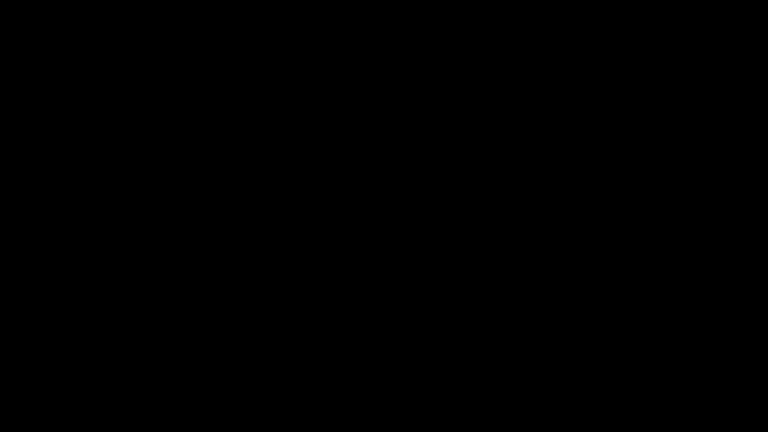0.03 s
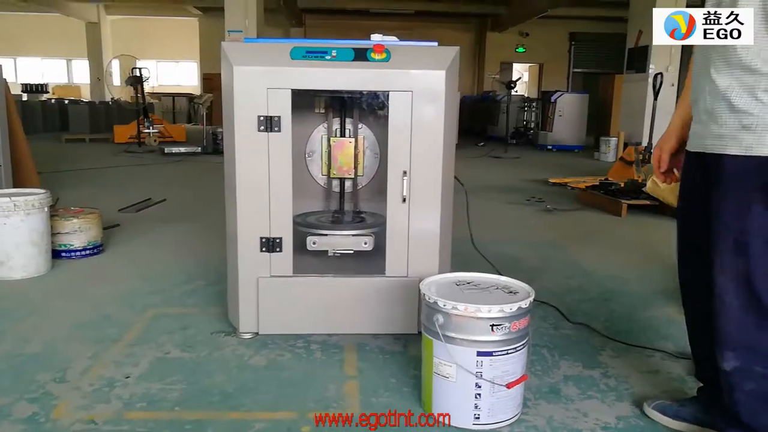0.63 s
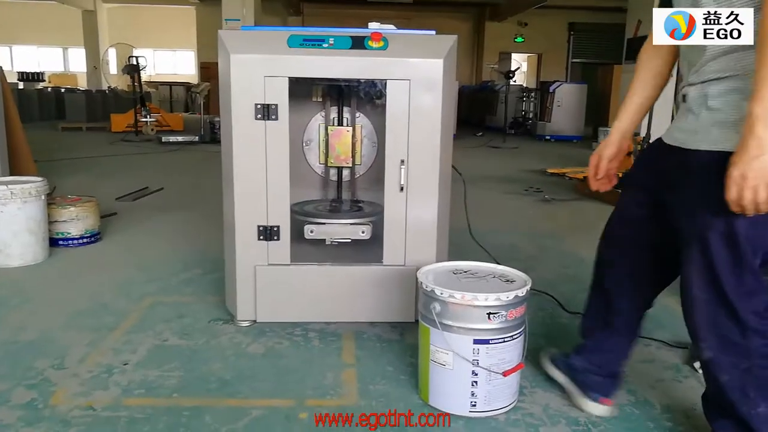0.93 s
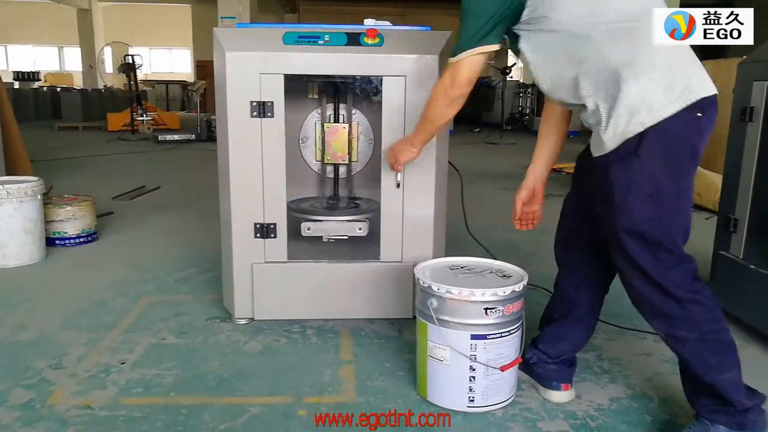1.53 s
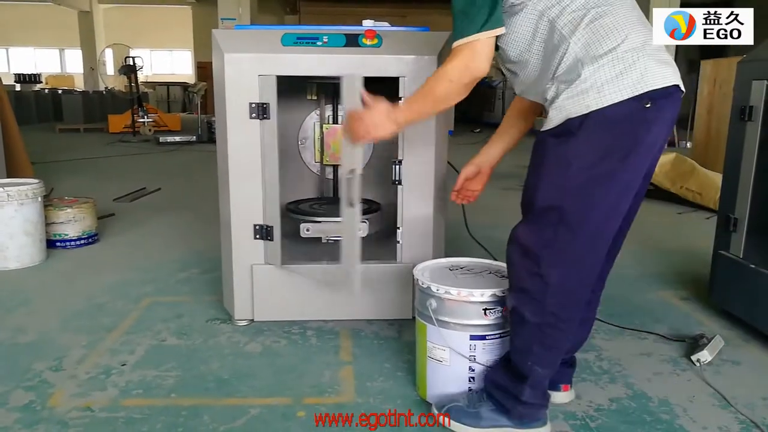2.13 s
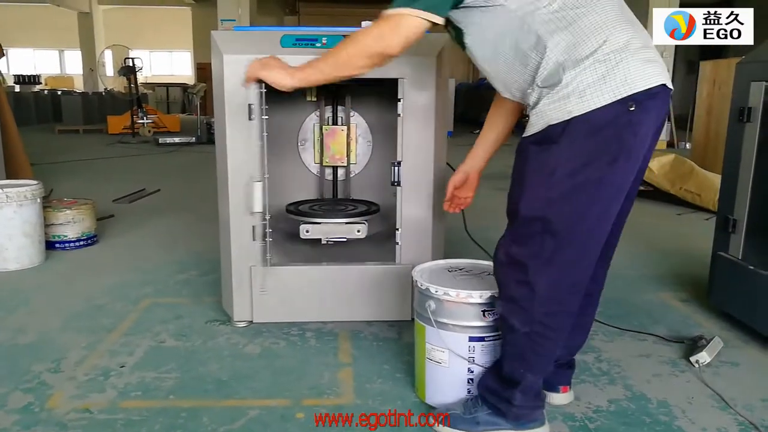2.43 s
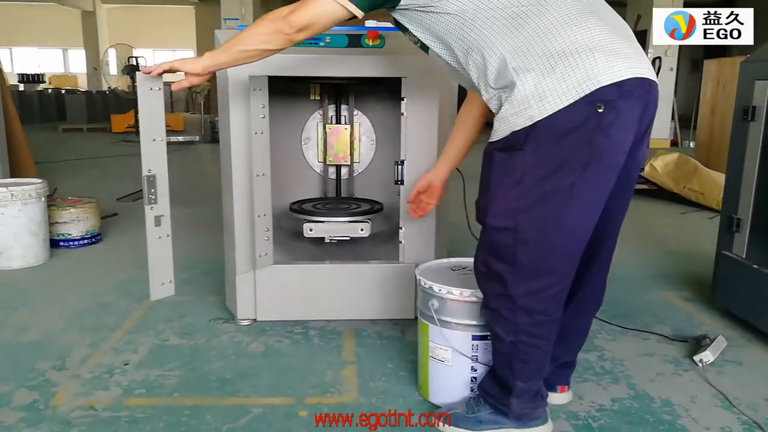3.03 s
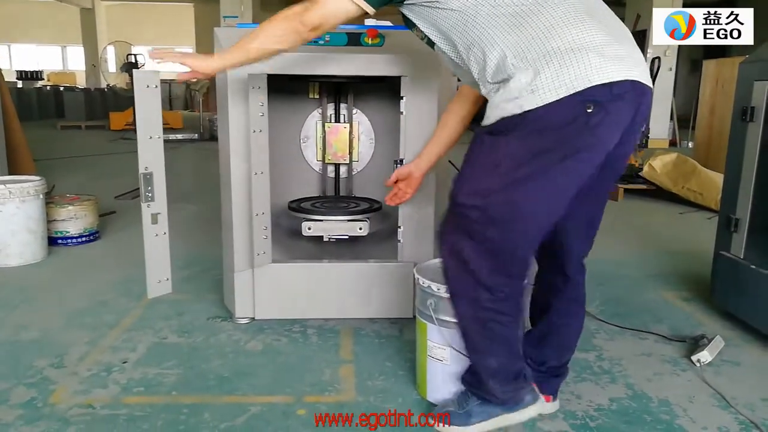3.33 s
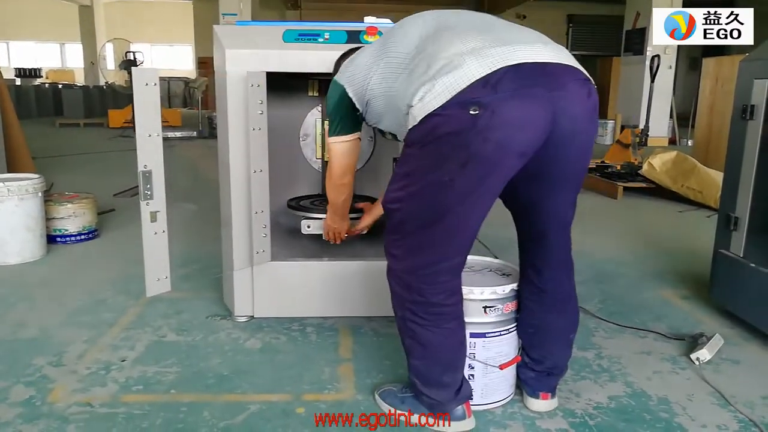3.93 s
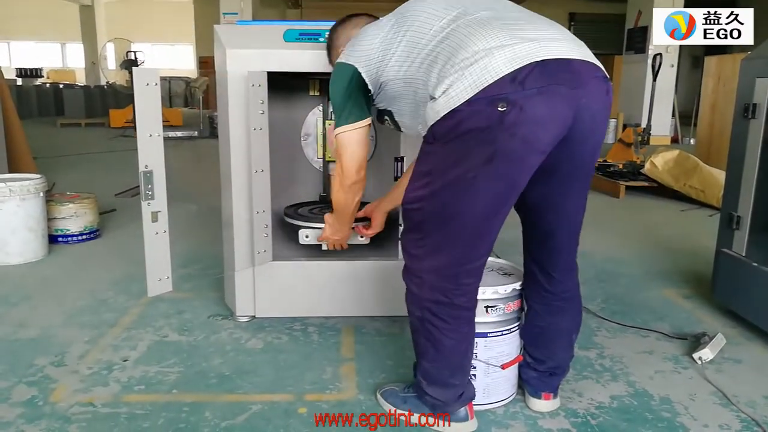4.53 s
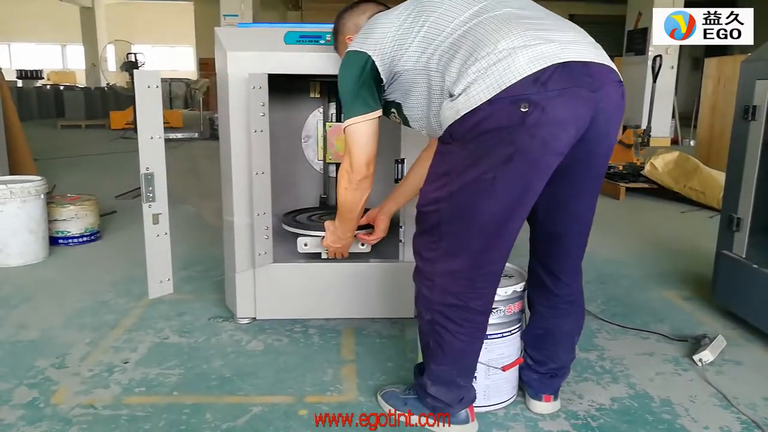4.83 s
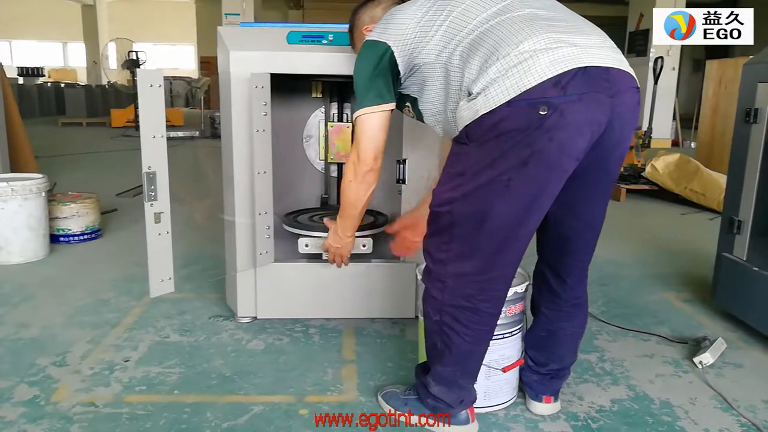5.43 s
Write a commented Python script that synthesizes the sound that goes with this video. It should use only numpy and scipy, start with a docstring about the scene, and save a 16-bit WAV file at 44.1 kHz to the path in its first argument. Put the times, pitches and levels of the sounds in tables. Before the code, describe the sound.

Steady ventilation hums in a large workshop. Clothes rustle faintly, a soft step lands, and a paint mixer's door unlatches with light clicks, a dull thud and a tiny squeak. A steel clamp catch snaps loudly and scrapes, then the tray rumbles over its rails and hits its stop with a ringing clack and rattle. The microphone picks up the hall's echo on the metal impacts.

```python
"""The clamp tray of a paint mixer booms over its rails, clacks against its end stop and rattles.
Its rollers drive the cabinet's panel resonances; each impact on steel excites modes that ring and decay.
Before that a man steps up with rustling clothes, unlatches the door on its faintly squeaking hinge,
and the clamp catch snaps free. A large workshop hall reverberates over steady ventilation.
The sound opens with a soft pop."""
import sys
import numpy as np
from scipy import signal
from scipy.fft import rfft, irfft
from scipy.io import wavfile
from scipy.ndimage import uniform_filter1d

SR = 44100
rng = np.random.default_rng(int(sys.argv[2]) if len(sys.argv) > 2 else 0)


def to_wav(sig):
    """Store sig (one row per channel, or 1-D mono) as 16-bit WAV at the path in sys.argv[1].

    Samples outside -1..1 are clipped; the rate is SR.
    """
    pcm = np.clip(np.atleast_2d(sig), -1, 1) * 32767
    pcm = np.round(pcm).astype(np.int16)
    wavfile.write(sys.argv[1], SR, pcm.T)  # frames by channels


N = 250488
T = np.arange(N) / SR
TAIL = np.arange(SR) / SR  # time axis of echoes and booms, 1 s
RING = TAIL[:SR // 2]  # time axis of impacts and squeaks, 0.5 s

# Spectra give shape only; mode and resonance gains are relative.
# air noise common to both sides: frequency_hz, density_db
AIR_MID_SPECTRUM = [(15, -46), (25, -13), (50, 1.5), (66, -5), (135, -3), (175, -9), (255, -7.5),
                    (330, -11.5), (450, -15.5), (600, -19), (850, -17), (1100, -16), (1500, -18.5),
                    (2250, -19.5), (3200, -23.5), (4500, -26), (7100, -28), (10500, -43), (15500, -53)]
# air noise differing between the sides: frequency_hz, density_db
AIR_SIDE_SPECTRUM = [(35, -51), (60, -23), (175, -15.5), (298, -9), (343, -2), (394, -16), (486, -4),
                     (657, -6), (1420, -10.5), (2250, -7), (3270, -15), (6710, -17.5), (15500, -44.5)]
# tones of distant motors: pitch_hz, level_db
MOTOR_TONES = [(49.5, -56), (100, -64), (300.5, -62), (397, -70), (549, -67.5), (646, -69.5), (1098, -68.5),
               (2170, -69), (2578, -70.5), (3467, -75)]
# hall reverberation: frequency_hz, t60_s
HALL_DECAY = [(200, 0.3), (1000, 0.62), (4000, 0.83), (7000, 0.84), (11000, 0.4), (16000, 0.23)]

# clothes rustle as he steps and bends: peak_s, level_db, rise_and_fall_s
CLOTH_STROKES = [(.66, -59.5, 0.17), (2.32, -59, .06), (3.16, -53, 0.074), (3.41, -50.5, 0.022),
                 (3.98, -55.5, 0.12)]
# cloth friction: frequency_hz, density_db
CLOTH_SPECTRUM = [(500, -15), (1500, -13), (3500, -3), (7000, -8), (10000, -20.5), (15000, -35)]
# a footfall and the door pulling free: start_s, level_db, pitch_hz, swell_s
THUDS = [(1.425, -48, 98, 0.011), (1.895, -42.5, 77.4, 0.015), (1.935, -52, 85.6, .013)]
# slips of the hinge: start_s, length_s, level_db, pitch_hz
HINGE_SLIPS = [(2.19, .068, -63, 5370), (2.388, .032, -62, 5380), (2.412, .075, -62, 5300)]
# light clicks of door latch and fittings: start_s, level_db, tilt_db_per_octave
LATCH_BLOWS = [(1.680, -51, 3), (1.688, -43, 5), (1.712, -50, 13), (1.994, -44.5, 4), (2.015, -52, 4),
               (2.044, -51, 1), (3.541, -46, 6.5), (4.987, -55, 12)]
# dense sheet modes at the latch: frequency_hz, density_db
LATCH_SPECTRUM = [(500, 5), (1000, 10), (2000, 3), (3200, 5.5), (5000, 0.5), (7000, 0), (10000, -11.5),
                  (15000, -36)]
# mode clusters of the latch: pitch_hz, gain_db, t60_s
LATCH_MODES = [(2170, -10, .2), (3130, 6, 0.22), (3360, -6, .15), (3840, 5, 0.21), (6300, -6, .14),
               (7040, -5, 0.18)]

# the clamp scrapes as it gives way: peak_s, level_db, rise_and_fall_s
SCRAPE_STROKES = [(4.334, -39.5, 0.04), (5.02, -46, 0.025)]
# clamp friction: frequency_hz, density_db
SCRAPE_SPECTRUM = [(600, -19), (1250, -13.5), (1480, -6), (1620, -0.5), (1760, -15), (2600, -18),
                   (6000, -26), (12000, -45)]
# blows on the clamp catch: start_s, level_db, tilt_db_per_octave
CATCH_BLOWS = [(4.1325, -26.5, 3), (4.140, -32, 6), (4.153, -35.5, 0)]
# dense sheet modes at the catch: frequency_hz, density_db
CATCH_SPECTRUM = [(400, -36), (750, -12), (900, -12), (1300, -1), (1600, -1), (1950, -7), (2300, -10),
                  (2700, -2), (3100, -7), (4250, -15), (4700, -4), (6300, -6), (6800, -5), (7300, -8.5),
                  (8000, -8), (9500, -10), (10800, -16), (15500, -22)]
# mode clusters of the catch: pitch_hz, gain_db, t60_s
CATCH_MODES = [(873, 4, 0.16), (1500, 2, 0.14), (1680, 1.5, 0.24), (1690, 6.5, 0.081), (1780, -1, 0.13),
               (1996, 9.5, 0.099), (2510, -6, 0.25), (3840, -6.5, 0.2), (4780, -11, 0.12), (5400, -5, 0.13),
               (6200, -3, 0.16), (7732, -9, 0.082), (7840, -3.5, 0.054), (9200, -4, 0.055),
               (10250, -7, 0.053), (12460, -15, .09)]
# dense modes of the loose clamp handle: frequency_hz, density_db
HANDLE_SPECTRUM = [(900, -26), (2400, -15), (3300, 0), (4100, -4.5), (5100, -9), (5800, -3), (7000, -0.5),
                   (8500, -1), (10500, -12.5), (15500, -27)]
# mode clusters of the handle: pitch_hz, gain_db, t60_s
HANDLE_MODES = [(3390, -2.5, .22), (3536, -1, 0.28), (5130, -4, 0.15), (5270, 1, .12), (6300, -2, .12),
                (6910, 4, .13), (6800, 1, .1)]

# the tray hits its end stop and rattles: start_s, level_db, tilt_db_per_octave
STOP_BLOWS = [(5.292, -26, 0.5), (5.309, -29.5, -1), (5.317, -37.5, -2.5), (5.335, -41, 2), (5.352, -48, 4),
              (5.364, -38.5, 0), (5.378, -49, 2)]
# dense sheet modes at the stop: frequency_hz, density_db
STOP_SPECTRUM = [(400, -50), (750, -10), (900, -13), (1050, -13), (1400, -9.5), (1650, -8), (2050, -6),
                 (2400, -9), (2800, -6.5), (4000, -10), (4900, -2), (5800, -6.5), (6600, -4.5), (8800, -11),
                 (11000, -17), (15500, -19)]
# mode clusters of the stop: pitch_hz, gain_db, t60_s
STOP_MODES = [(870, 2.5, 0.18), (1780, -10, .14), (1985, 1.5, 0.12), (2020, 5, 0.14), (2740, 0.5, 0.2),
              (2940, 0, 0.15), (3470, -1, 0.32), (3835, 0, 0.21), (4300, -2, 0.21), (4560, -6, .13),
              (4940, 0.5, 0.25), (5120, 0, 0.16), (5370, -9, .14), (6530, 4.5, 0.13), (7250, -2, .1),
              (7900, -6, 0.12), (8950, -4, .12), (11800, -16, .12), (14000, -11, .11)]
# the tray plate answers the stop with hollow knocks: start_s, level_db, pitch_hz, swell_s
PLATE_KNOCKS = [(5.304, -37, 893, 0.0075), (5.350, -44, 896, .012)]
# the hands pull the tray in surges: peak_s, rumble_db, hiss_db, rise_s, fall_s
TRAY_PULLS = [(4.61, -43.5, -52, 0.14, 0.099), (4.76, -57, -58, 0.094, 0.079),
              (5.08, -33, -78, 0.068, 0.13), (5.6, -51.5, -74, 0.69, 0.22)]
# the hardest bumps of the rollers on the rails: start_s, level_db, pitch_hz, swell_s
ROLLER_BUMPS = [(4.541, -35, 152, 0.0062), (4.577, -29, 159, 0.0063), (4.612, -31.5, 168, 0.0074),
                (4.643, -34, 156, 0.0068), (4.692, -36, 159, 0.012), (4.723, -40, 154, .008),
                (4.754, -31.5, 147, 0.0077), (4.842, -38, 150, 0.0071), (4.872, -40, 151, 0.0089),
                (4.992, -39, 290, 0.0023), (5.000, -34, 147, 0.0088), (5.028, -25.5, 169.4, 0.008),
                (5.061, -33, 165, .002), (5.081, -38, 190, .002), (5.092, -30, 145, 0.0074),
                (5.128, -30, 160, .003), (5.152, -33.5, 151, .008), (5.200, -35.5, 97, 0.013)]
# cabinet panel resonances: centre_hz, width_hz, gain_db
PANEL_RESONANCES = [(50, 7.8, -9), (101.6, 24, 0.5), (160, 23, 5), (253, 32, -3), (340, 90, -11)]
# steel sliding on the rails: frequency_hz, density_db
RAIL_SPECTRUM = [(400, -8), (1500, 6.5), (3000, -10), (7000, -0.5), (11000, -13), (15000, -28)]


def undb(db):
    """Amplitude ratio of a level in decibels."""
    return 10 ** (np.asarray(db) / 20)


def unit(x):
    """Normalisation to rms 1."""
    return x / np.sqrt(np.mean(x ** 2))


def along(points, hz):
    """Interpolation of (frequency_hz, value) points on a log-frequency axis."""
    frequencies, values = np.transpose(points)
    return np.interp(np.log(hz + 1), np.log(frequencies), values)


def shape(x, gain):
    """Zero-phase filtering: the spectrum is multiplied by gain(hz)."""
    n = x.shape[-1]
    return irfft(rfft(x) * gain(np.arange(n // 2 + 1) * SR / n), n)


def noise(spectrum, size):
    """Spectral shaping of white noise, at rms 1."""
    return unit(shape(rng.standard_normal(size), lambda hz: undb(along(spectrum, hz))))


def wander(rate_hz):
    """Random modulation: smoothed steps with a spread near 1."""
    hold = int(SR / rate_hz)
    steps = np.repeat(rng.standard_normal(N // hold + 1), hold)
    return 1.3 * uniform_filter1d(uniform_filter1d(steps, hold), hold)[:N]


def add(out, start_s, x):
    """Superposition of x on out from start_s."""
    i = int(start_s * SR)
    out[:, i:i + x.shape[-1]] += x[..., :N - i]


def surge(peak_s, db, rise_s, fall_s):
    """Exponential growth to a peak, then exponential decay."""
    return undb(db) * np.exp(-abs(T - peak_s) / np.where(T < peak_s, rise_s, fall_s))


def damped(x, t60):
    """Frequency-dependent damping: each half-octave band falls 60 dB in t60(hz) seconds."""
    out = 0
    for centre_hz in 125 * 2 ** (np.arange(15) / 2):
        band = shape(x, lambda hz: np.clip(1 - 2 * abs(np.log2((hz + 1) / centre_hz)), 0, 1))
        out += band * np.exp(-np.log(1000) * TAIL[:x.shape[-1]] / t60(centre_hz))
    return out


def friction(strokes, spectrum, grain_db):
    """Friction noise swells with each stroke and flickers as the surfaces catch and slip."""
    pressure = sum(surge(peak_s, db, fade_s, fade_s) for peak_s, db, fade_s in strokes)
    return noise(spectrum, (2, N)) * pressure * undb(grain_db * wander(120))


def booms(pushes):
    """Transient response of one mode: a tone swells and fades; a short push gives a dull knock."""
    out = np.zeros((2, N))
    for start_s, db, hz, swell_s in pushes:
        swell = TAIL / swell_s * np.exp(1 - TAIL / swell_s)
        add(out, start_s, undb(db) * swell * np.sqrt(2) * np.sin(2 * np.pi * hz * TAIL))
    return out


def clusters(modes, cluster_hz, tilt):
    """Close modes beat, as narrow bands of decaying noise; cluster_hz is their half-width at 1 kHz."""
    struck, ringing = 0, 0
    for pitch_hz, db, t60_s in modes:
        width_hz = cluster_hz * np.sqrt(pitch_hz / 1000)
        resonance = lambda hz: undb(db) * tilt(pitch_hz) / (1 + ((hz - pitch_hz) / width_hz) ** 2)
        band = shape(rng.standard_normal((2, len(RING))), resonance)
        struck += band
        ringing += band * np.exp(-np.log(1000) * RING / t60_s)
    return ringing / np.std(struck)


def struck_steel(blows, spectrum, modes, bass_t60_s, modes_db, cluster_hz, damping, contact_s):
    """Impact excitation: a contact crack, dense sheet modes whose highs die first, and mode clusters."""
    crack_db, crack_fade_s = -5, .002
    out = np.zeros((2, N))
    t60 = lambda hz: bass_t60_s / (1 + damping * (hz / 10000) ** 2)
    for start_s, db, db_per_octave in blows:
        tilt = lambda hz: undb(db_per_octave * np.log2(np.maximum(hz, 1500) / 4000))
        white = rng.standard_normal((2, len(RING)))
        sheet = shape(white, lambda hz: tilt(hz) * undb(along(spectrum, hz)))
        ring = damped(unit(sheet), t60) + undb(modes_db) * clusters(modes, cluster_hz, tilt)
        crack = undb(crack_db) * unit(np.gradient(sheet, axis=1)) * np.exp(-RING / crack_fade_s)
        attack = 1 - np.exp(-RING / contact_s)
        add(out, start_s, undb(db) * (ring + crack) * attack)
    return out


def ventilation():
    """Broadband air noise, coherent between the sides in the bass, with the tones of distant motors."""
    mid = noise(AIR_MID_SPECTRUM, N) * undb(-46.5 + 0.29 * wander(5.37))
    side = noise(AIR_SIDE_SPECTRUM, N) * undb(-50.5)
    hum = 0
    for hz, db in MOTOR_TONES:
        amplitude = np.sqrt(2) * undb(db + 2 * wander(3.86))
        phase_drift = np.sqrt(hz / 600) * wander(14)  # unsteady shaft speed smears high tones most
        hum += amplitude * np.sin(2 * np.pi * hz * T + phase_drift)
    return mid + hum + np.array([side, -side])


def hall(x, wet_db, build_s):
    """Reverberation: a diffuse field builds up and decays, lasting longest at 4-7 kHz."""
    echoes = damped(rng.standard_normal((2, SR)), lambda hz: along(HALL_DECAY, hz))
    response = unit(echoes * (1 - np.exp(-TAIL / build_s))) / np.sqrt(SR)
    return x + undb(wet_db) * signal.fftconvolve(x, response, axes=1)[:, :N]


def clothes():
    """Friction of cloth on cloth gives a grainy rustle."""
    return friction(CLOTH_STROKES, CLOTH_SPECTRUM, grain_db=2.0)


def hinge(sag_hz_per_s=540, wobble_hz=110, edge_s=.012):
    """Stick-slip friction: each slip of the dry hinge sings a thin tone that sags and wavers."""
    out = np.zeros((2, N))
    for start_s, length_s, db, hz in HINGE_SLIPS:
        pitch_hz = hz - sag_hz_per_s * RING + wobble_hz * wander(700)[:len(RING)]
        slip = np.clip(np.minimum(RING, length_s - RING) / edge_s, 0, 1)
        add(out, start_s, undb(db) * slip * np.sqrt(2) * np.sin(2 * np.pi * np.cumsum(pitch_hz) / SR))
    return out


def door_latch():
    """Brief, light impacts excite the high modes of the latch and fittings."""
    return struck_steel(LATCH_BLOWS, LATCH_SPECTRUM, LATCH_MODES, bass_t60_s=0.21,
                        modes_db=-9.0, cluster_hz=28, damping=0.18, contact_s=0.00061)


def clamp_scrape():
    """Sliding friction of the clamp gives a hiss that peaks near 1.6 kHz."""
    return friction(SCRAPE_STROKES, SCRAPE_SPECTRUM, grain_db=0.5)


def clamp_catch():
    """Free vibration after three quick blows as the catch snaps open, a little to the right."""
    snap = struck_steel(CATCH_BLOWS, CATCH_SPECTRUM, CATCH_MODES, bass_t60_s=0.12,
                        modes_db=0.5, cluster_hz=40, damping=0.4, contact_s=0.0019)
    return snap * undb([[-1], [1]])


def loose_handle(start_s=5.395, first_gap_s=.019, gap_growth=1.2):
    """Inelastic collisions: the swinging handle taps ever more slowly, weakly and dully."""
    tap = np.arange(5)
    gaps_s = first_gap_s * gap_growth ** tap
    times_s = start_s + np.cumsum(gaps_s) - gaps_s
    levels_db = -33.5 - 3 * tap
    db_per_octave = 0.5 - 4 * tap
    blows = zip(times_s, levels_db, db_per_octave)
    return struck_steel(blows, HANDLE_SPECTRUM, HANDLE_MODES, bass_t60_s=0.17,
                        modes_db=-2.0, cluster_hz=27, damping=0.21, contact_s=0.00071)


def end_stop():
    """Impact and rebound: the tray strikes its stop repeatedly and rings the steel's modes."""
    return struck_steel(STOP_BLOWS, STOP_SPECTRUM, STOP_MODES, bass_t60_s=0.2,
                        modes_db=-0.5, cluster_hz=32, damping=.12, contact_s=0.0019)


def judder(rolling, count=48, bumps_per_s=28, panel_hz=155, swell_s=0.0034):
    """Irregular excitation: from the catch's release on, small bumps scale with the rolling envelope."""
    lateness, size, detune = rng.standard_normal((count, 3)).T
    release_s = CATCH_BLOWS[0][0]
    times_s = release_s + (np.arange(count) + lateness / 4) / bumps_per_s
    levels_db = 20 * np.log10(np.interp(times_s, T, rolling)) - 4 + 0.5 * size
    pitches_hz = panel_hz * (1 + 0.087 * detune)
    bumps = np.transpose([times_s, levels_db, pitches_hz, np.full(count, swell_s)])
    return booms(bumps[times_s < T[-1]])


def rolling_tray():
    """Forced vibration: the rollers shake the cabinet panels, hiss on the rails and boom over bumps."""
    rolling = sum(surge(peak_s, db, rise_s, fall_s) for peak_s, db, _, rise_s, fall_s in TRAY_PULLS)
    sliding = sum(surge(peak_s, db, rise_s, fall_s) for peak_s, _, db, rise_s, fall_s in TRAY_PULLS)
    panels = lambda hz: sum(undb(db) / (1 + 2 * ((hz - centre_hz) / width_hz) ** 2)
                            for centre_hz, width_hz, db in PANEL_RESONANCES)
    mid, side = unit(shape(rng.standard_normal((2, N)), panels))
    rumble = (mid + undb(-16.0) * np.array([side, -side])) * rolling
    hiss = noise(RAIL_SPECTRUM, (2, N)) * sliding
    bumps = booms(ROLLER_BUMPS) + judder(rolling)
    return bumps + rumble + hiss * undb(1.2 * wander(39))


def scene():
    """Superposition: strongly reverberant steel impacts, drier handling sounds and the ventilation."""
    impacts = door_latch() + clamp_catch() + end_stop() + loose_handle()
    rubbing = clothes() + clamp_scrape()
    thumps = booms(THUDS) + booms(PLATE_KNOCKS)
    metal = hall(impacts, wet_db=-5.0, build_s=0.0068)
    handling = hall(rolling_tray() + thumps + rubbing + hinge(), wet_db=-23.0, build_s=0.055)
    return metal + handling + ventilation()


def record(dry, open_s=.336, pop_db=-27.5, cutoff_hz=15700):
    """Damped step response: silence ends in a soft pop whose offset swings to rest; the top is cut."""
    age_s = np.maximum(T - open_s, 0)
    pop = -undb(pop_db) * np.exp(-age_s / .22) * np.cos(2 * np.pi * 1.4 * age_s)
    lowpass = signal.ellip(10, .2, 80, cutoff_hz, fs=SR, output="sos")
    return signal.sosfilt(lowpass, (dry + pop) * (T >= open_s))


dry = scene()
out = record(dry)
to_wav(out)
```